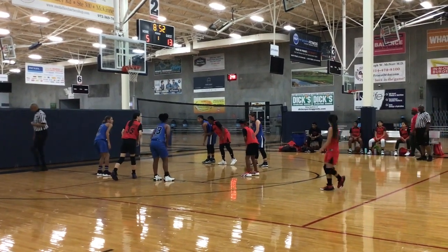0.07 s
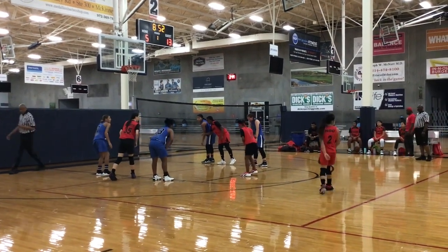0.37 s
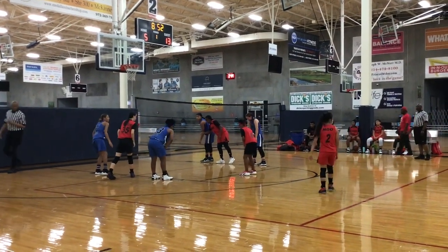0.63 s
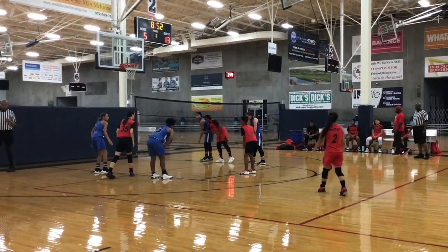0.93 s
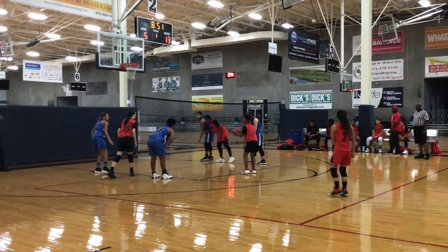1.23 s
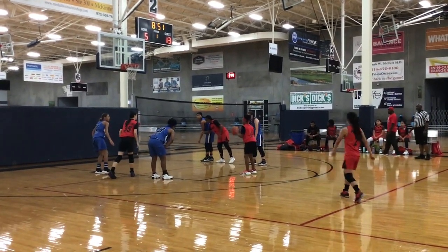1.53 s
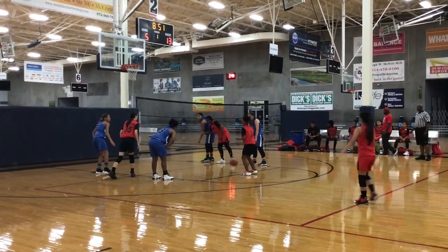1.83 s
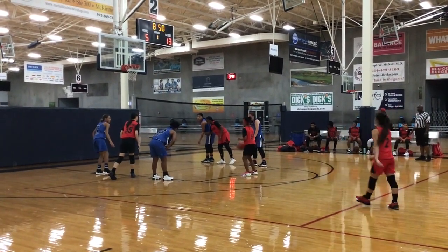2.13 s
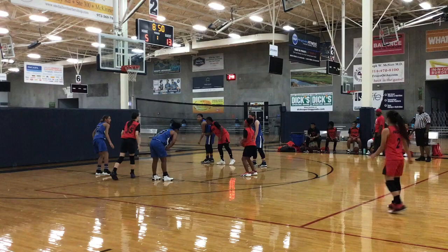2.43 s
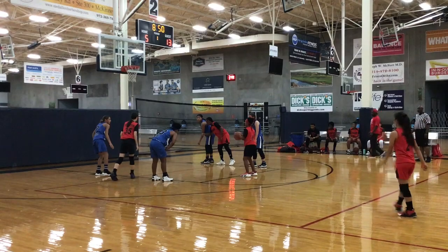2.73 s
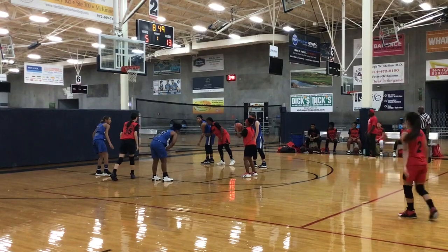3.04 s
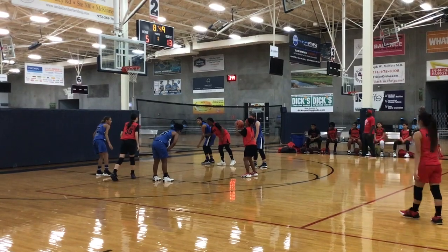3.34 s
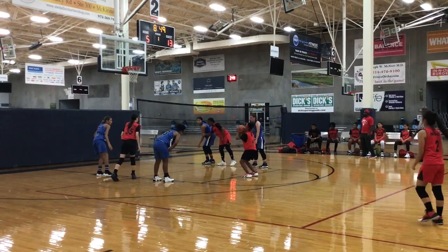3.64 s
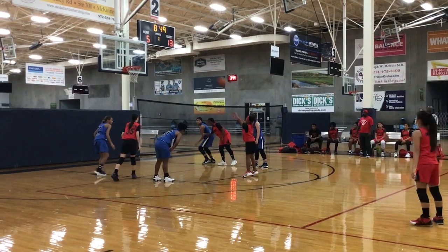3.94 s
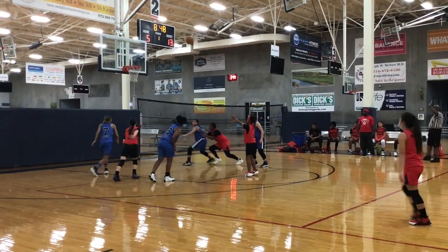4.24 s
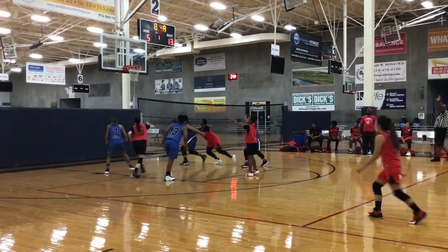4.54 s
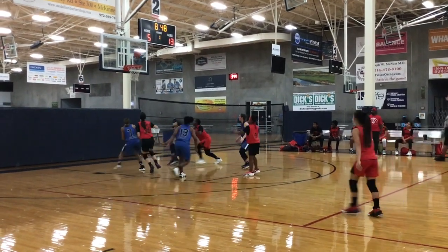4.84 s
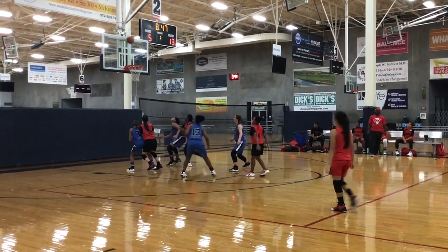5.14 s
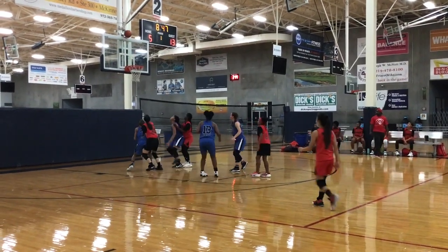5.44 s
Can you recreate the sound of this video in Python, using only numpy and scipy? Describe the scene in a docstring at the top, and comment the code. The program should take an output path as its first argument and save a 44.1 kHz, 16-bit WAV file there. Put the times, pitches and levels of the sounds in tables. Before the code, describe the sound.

A low, steady ventilation rumble and a faint patter of distant feet fill a large gym, where every sound leaves an echoing tail. A brief sneaker squeak opens the scene. A basketball hits the hardwood with a sharp slap and a deep thump at about 0.2 and 0.75 seconds, with heavy footsteps around it until 1 second. A step and a duller bounce come at 2 seconds, followed by a light tap and a small squeak at 2.6. The loudest squeak, short and very high, cuts through at about 3.1 seconds, trailed by a couple of faint taps. The ball bounces a last time at 4.1 seconds. Play then gets busier: a squeak at 4.4, a slapping step at 4.7, and a quick cluster of thudding steps, squeaks and scuffs around 5 seconds, with one more step near 5.5.

```python
"""A large gym with a springy hardwood floor, during a basketball game.
The ball and the players' feet slap the boards and set them thumping. Rubber soles
squeak as they stick and slip, or scuff as they skid. The hall answers with echoes
and a long fading tail, over the rumble of ventilation and the patter of far-off play."""
import sys
import numpy as np
from scipy import signal
from scipy.fft import rfft, irfft, next_fast_len
from scipy.io import wavfile
from scipy.ndimage import uniform_filter1d

SR = 44100
rng = np.random.default_rng(int(sys.argv[2]) if len(sys.argv) > 2 else 0)


def dump_mix(stems):
    """Bounce the given channels to the path in sys.argv[1] as a 16-bit WAV at rate SR."""
    frames = np.atleast_2d(stems).T  # one column per channel
    limited = np.clip(frames, -1, 1)  # hard clip at full scale
    pcm = np.round(limited * 32767).astype(np.int16)
    wavfile.write(sys.argv[1], SR, pcm)


N = 246533  # samples, about 5.6 s


def amp(db):
    """Turns decibels into a number to multiply a sound by."""
    return 10 ** (np.asarray(db) / 20)


def unit(x):
    """Scales a signal so that its average strength (rms) is 1."""
    return x / np.sqrt(np.mean(x ** 2) + 1e-20)


def look_up(points, hz):
    """Reads between the rows of a (frequency [Hz], value) table, with octaves evenly spaced."""
    f, value = np.transpose(points)
    return np.interp(np.log(hz + 1), np.log(f), value)


def add(mix, start_s, sound):
    """Adds a sound to the mix at the given time."""
    part = mix[max(round(start_s * SR), 0):][:len(sound)]
    part += sound[:len(part)]


def colour(x, gain):
    """Turns each frequency f up or down by gain(f)."""
    size = next_fast_len(len(x), True)
    return irfft(rfft(x, size) * gain(np.fft.rfftfreq(size, 1 / SR)), size)[:len(x)]


def noise(size):
    """An even hiss (white noise)."""
    return rng.standard_normal(size)


def wander(size, rate_hz):
    """A smooth random wiggle of strength 1 that changes at about this rate."""
    return unit(colour(noise(size), lambda f: np.exp(-(f / rate_hz) ** 2)))


def band(x, hz, octaves, order=2):
    """Keeps a band of frequencies around hz, scaled to strength 1."""
    edges = np.clip([hz / 2 ** (octaves / 2), hz * 2 ** (octaves / 2)], 1, [SR / 4, SR / 2 - 1])
    return unit(signal.sosfilt(signal.butter(order, edges, "band", fs=SR, output="sos"), x))


def two_paths(sound, send_db):
    """Splits a sound in two: straight to the listener, and sent out into the hall."""
    return np.outer(sound, [1, amp(send_db)])


# The tone of the hall's steady air: (frequency [Hz], relative level [dB])
AIR_TONE = [(15, -46.5), (25, -7), (43, -6.5), (64, -6.5), (82, -1.5), (119, -3), (178, -5.5), (227, -14.5),
            (349, -16.5), (410, -27), (445, -28.5), (1140, -37), (1270, -36.5), (4260, -50), (10500, -64.5),
            (13200, -69), (14200, -60.5), (15700, -63.5)]


def ventilation(rumble_db=-43, swell_db=0.85, fan_db=-50.5, fan_hz=56, fan_width_hz=6):
    """Moving air makes a wide, gently swelling rumble; a fan adds an unsteady drone."""
    rumble = unit(colour(noise(N), lambda f: amp(look_up(AIR_TONE, f))))
    drone = unit(colour(noise(N), lambda f: np.exp(-((f - fan_hz) / fan_width_hz) ** 2)))
    swell = amp(swell_db * wander(N, rate_hz=4.4))
    return amp(rumble_db) * rumble * swell + amp(fan_db) * drone


# How long the hall rings: (frequency [Hz], time to fade by 60 dB [s])
TAIL_FADE = [(100, 0.64), (500, 1), (1500, 2), (4000, 2.1), (7000, 1.43), (10000, 1), (15000, 0.17)]
# The tone of that ringing tail: (frequency [Hz], relative level [dB])
TAIL_TONE = [(100, 0.5), (500, -5.5), (1500, -5), (4000, -4.5), (8000, -5.5), (15000, -20)]
# Echoes from the walls and roof: (delay [s], relative level [dB])
ECHOES = [(0.0112, -8), (0.034, -15.5), (0.043, -13.5), (0.081, -12.5), (0.161, -24)]


def hall(x, build_s=0.00043, early_db=3, early_s=0.048, patchy_db=2, patch_s=0.02, patch_hz=900,
         scatter_s=0.00246, wall_hz=8000):
    """Walls and girders scatter echoes; a dense, uneven tail follows, its highest notes dying first."""
    hz, t, hiss = signal.stft(noise(2 * SR), SR, nperseg=256)  # a grid of frequency by time
    fade_s = look_up(TAIL_FADE, hz)[:, None]
    decay = np.exp(-np.log(1000) * t / fade_s)
    decay *= np.sqrt(2 * np.log(1000) / (fade_s * SR))  # long and short fades get equal energy
    onset = (1 - np.exp(-t / build_s)) * amp(early_db * np.exp(-t / early_s))
    # Random louder and softer patches, mostly in the treble.
    patches = uniform_filter1d(noise(hiss.shape), int(patch_s / t[1]) + 1, axis=1)
    patches = unit(uniform_filter1d(patches, int(patch_hz / hz[1]) + 1, axis=0))
    uneven = unit(amp(patchy_db * patches * (hz / (hz + patch_hz))[:, None]))
    tail = hiss * decay * onset * uneven * amp(look_up(TAIL_TONE, hz))[:, None]
    response = signal.istft(tail, SR, nperseg=256)[1]  # the hall's answer to one click
    scatter = np.exp(-np.arange(SR // 50) / (scatter_s * SR))
    wall_dulling = signal.butter(1, wall_hz, fs=SR)
    for delay_s, db in ECHOES:
        echo = signal.lfilter(*wall_dulling, noise(len(scatter)) * scatter)
        add(response, delay_s, amp(db) * echo / np.linalg.norm(scatter))
    return signal.fftconvolve(x, response)[:len(x)]


# How hard the far-off players run: (time [s], level [dB])
BUSTLE = [(0, -49.5), (.6, -52.5), (1.302, -59.5), (3.999, -56), (4.4, -49), (4.9, -53.5), (5.2, -46.5),
          (5.59, -52.5)]
# The tone of their footsteps: (frequency [Hz], relative level [dB])
PATTER_TONE = [(60, -16.5), (150, 6), (350, -3.5), (700, -10), (1500, -15.5), (3000, -23.5), (6000, -32),
               (15000, -51.5)]


def patter(steps_per_s=45, decay_s=0.0056, spread_db=2, lead_s=1):
    """Light steps all over the court, starting lead_s early so that the hall is already ringing."""
    t = np.arange(-lead_s * SR, N) / SR
    landings = rng.random(len(t)) < steps_per_s / SR
    weights = amp(spread_db * np.clip(noise(len(t)), -2, 1))
    envelope = signal.lfilter([1], [1, -np.exp(-1 / (decay_s * SR))], landings * weights)
    steps = colour(envelope * noise(len(t)), lambda f: amp(look_up(PATTER_TONE, f)))
    return unit(steps) * amp(np.interp(t, *np.transpose(BUSTLE)))


# Short hisses. Most are shoe scuffs; the faint, high one at 3.226 s echoes off the far wall
# after the loud squeak.
# (time [s], length [s], level [dB], centre frequency [Hz], width [octaves], send to hall [dB])
HISSES = [ (1.967, 0.0377, -77, 6840, 0.73, 3.5), (2.024, 0.021, -66, 4190, 1.7, 0),
          (2.048, 0.00345, -58, 5500, 1.24, -8), (3.08, 0.0236, -47, 9130, 1.14, -1),
          (3.0825, 0.012, -49.5, 2900, 2.6, 1), (3.226, 0.0317, -72, 11650, 0.46, -10.5),
          (3.43, 0.022, -67.5, 9140, 0.15, 5), (4.08, 0.0154, -66.5, 7500, 0.89, 5),
          (4.146, 0.04, -72, 8310, 1.3, -7.5), (4.351, 0.0026, -48, 6400, 0.7, -8),
          (4.923, 0.01477, -56, 4400, 1.68, -1), (5.088, 0.016, -43, 4225, 1.03, -12),
          (5.089, 0.041, -42.5, 880, 3.65, 0.5), (5.107, 0.0095, -37, 4050, 0.99, -15.5),
          (5.149, 0.0135, -55.5, 2790, 1.8, -5), (5.324, 0.046, -66, 5250, 1.3, -2),
          (5.389, 0.013, -53, 2490, 0.72, 0)]


def hisses(grain_db=5.0, rise_s=0.00078):
    """Short bursts of grainy hiss: skidding soles, and one echo off the far wall."""
    out = np.zeros((N, 2))
    t = np.arange(SR // 5) / SR
    for start_s, length_s, db, hz, octaves, send_db in HISSES:
        grains = noise(len(t)) * amp(grain_db * wander(len(t), rate_hz=360))
        envelope = (1 - np.exp(-t / rise_s)) * np.exp(-(t / length_s) ** 2)
        add(out, start_s, two_paths(amp(db) * band(grains, hz, octaves) * envelope, send_db))
    return out


# How well a sole gives off sound: (frequency [Hz], relative level [dB])
SOLE_TONE = [(2700, -0.5), (4500, 1), (6600, 3), (8500, -4.5), (11000, 0), (15000, -14)]
# Shoe squeaks and, at 3.228 s, a faint, rough echo of the loud squeak:
# (time [s], length [s], level [dB], pitch [Hz], opening bend [share of pitch],
# closing bend [share of pitch], roughness [0-1], drop per overtone [dB], send to hall [dB])
SQUEAKS = [ (0.0108, 0.0215, -38.5, 4390, 0.075, -0.005, 0.2, 7.8, -4.5),
           (1.196, 0.0104, -74, 4350, 0.03, 0.02, 0.2, 8.5, 16),
           (1.225, 0.00673, -53, 4489, 0.1, -0.08, 0.236, 11, -3.5),
           (2.619, 0.039, -46.5, 3315, -0.16, -0.045, 0.16, 7, -7.5),
           (3.0651, 0.0074, -37.5, 6220, -0.1, 0.039, 0.41, 4.7, -10.5),
           (3.072, 0.029, -38, 5400, 0.06, -0.0076, 0.56, 10, -4.5),
           (3.0803, 0.0119, -27.5, 5700, -0.0061, 0.0059, 0.028, 16, -18),
           (3.083, 0.013, -33, 6596, 0.01, -0.02, 0.19, 28, -11),
           (3.089, 0.015, -54, 3170, 0.016, -0.041, 0.4, 20, 3.5),
           (3.228, 0.0356, -57, 5106, 0.03, -0.012, 0.76, 24, 0),
           (4.3627, 0.01, -34.5, 3496, 0.09, 0.046, 0.18, 8, -7.5),
           (4.9248, 0.011, -46.5, 3155, -0.029, 0.11, 0.4, 9.2, 3),
           (4.939, 0.01116, -39.5, 3585, -0.041, 0.037, 0.58, 10, -5),
           (5.0243, 0.01, -43, 4790, 0.042, -0.01, 0.08, 19.5, 2.5),
           (5.088, 0.019, -42, 2730, 0.031, -0.0058, 0.27, 14.3, -3),
           (5.092, 0.0058, -41, 4700, 0.036, 0, 0.26, 16.7, -7)]


def squeaks(attack_s=0.00093, release_s=0.0033, settle_share=0.3426, lift_share=0.674,
            wobble=0.012, wobble_db=-1.5, wobble_hz=140, jitter=0.0995, jitter_hz=900,
            flutter_depth=0.19, flutter_hz=741, shimmer=0.26, rasp_db=-15):
    """Rubber sticks and slips thousands of times a second; a fluttering tread adds side tones and rasp."""
    out = np.zeros((N, 2))
    t = np.arange(SR // 10) / SR
    harmonic = np.arange(1, 6)[:, None]  # the note and its four overtones
    flutter = flutter_depth * np.sin(2 * np.pi * flutter_hz * t)
    for start_s, length_s, db, pitch_hz, bend, end_bend, rough, drop_db, send_db in SQUEAKS:
        pressure = wander(len(t), wobble_hz)  # uneven pressure sways both pitch and level
        # The pitch settles as the sole takes the weight, then bends again as it lets go.
        settle = 1 + bend * np.exp(-(t / (settle_share * length_s)) ** 4)
        lift = 1 + end_bend * (1 - np.exp(-(t / (lift_share * length_s)) ** 8))
        waver = 1 + wobble * pressure + jitter * rough * wander(len(t), jitter_hz)
        hz = pitch_hz * settle * lift * waver
        phase = 2 * np.pi * np.cumsum(hz) / SR
        strengths = amp(look_up(SOLE_TONE, harmonic * hz) - drop_db * harmonic)
        strengths *= harmonic * hz < SR / 2  # skip overtones too high for the sample rate
        slip = np.sum(strengths * np.sin(harmonic * phase), axis=0)
        grip = 1 + rough * (flutter + shimmer * wander(len(t), jitter_hz))
        rasp = rough * amp(rasp_db) * band(noise(len(t)), pitch_hz, octaves=0.5)
        envelope = np.clip(np.minimum(t / attack_s, (length_s - t) / release_s), 0, 1)
        squeak = amp(db + wobble_db * pressure) * envelope * (unit(slip * grip) + rasp)
        add(out, start_s, two_paths(squeak, send_db))
    return out


def slap(hz, decay_s, octaves, grit=1.0, glide=0.53, glide_s=0.0016, tick_db=-27,
         rattle_db=-19, rattle_s=0.0164, rise_s=0.0013):
    """Air squeezed from under a widening contact chirps downward; the boards rattle after it."""
    t = np.arange(SR // 10) / SR
    pitch = hz * (1 + glide * (2 * np.exp(-t / glide_s) - 1))
    chirp = np.sin(2 * np.pi * np.cumsum(pitch) / SR)
    grain = band(noise(len(t)), hz, octaves)
    tick = amp(tick_db) * noise(len(t)) * np.exp(-t / decay_s)
    burst = (chirp + grit * grain) * np.exp(-(t / decay_s) ** 2 / 2)
    rattle = amp(rattle_db) * grain * np.exp(-t / rattle_s)
    return (burst + tick + rattle) * (1 - np.exp(-t / rise_s))


# Sharp taps of a hand or a shoe tip: (time [s], level [dB], pitch [Hz])
TAPS = [(.34, -41, 2600), (2.123, -41, 2880), (3.298, -45.5, 3980), (3.331, -43.5, 1420),
        (4.128, -44, 2630), (4.33, -46.5, 2400), (4.674, -39.5, 4296)]


def taps(send_db=-5.0):
    """A touch too light to make the floor thump gives only a slap."""
    out = np.zeros(N)
    for start_s, db, hz in TAPS:
        add(out, start_s, amp(db) * slap(hz, decay_s=0.0014, octaves=0.97, grit=0.99, tick_db=-22))
    return two_paths(out, send_db)


def thump(hz, swell_s=0.0081, sharpness=3.78, ring_db=-15.0, ring_hz=225, ring_s=0.024,
          knock_db=-29, knock_hz=480, knock_s=0.0068):
    """The springy boards knock, sink, swing a few times and settle while their higher notes ring on."""
    t = np.arange(SR // 5) / SR
    envelope = (t / swell_s * np.exp(1 - t / swell_s)) ** sharpness
    swing = envelope * np.cos(2 * np.pi * hz * t)
    ring_envelope = np.exp(-t / ring_s) * (1 - np.exp(-t / swell_s))
    ring = band(noise(len(t)), ring_hz, octaves=0.742) * ring_envelope
    knock = band(noise(len(t)), knock_hz, octaves=1.0) * t / knock_s * np.exp(1 - t / knock_s)
    return swing + amp(ring_db) * ring + amp(knock_db) * knock


# Heavy footsteps: (time [s], thump level [dB], thump pitch [Hz], slap level [dB], slap pitch [Hz])
FOOTSTEPS = [(.264, -24.5, 176.8, -45, 2047), (.293, -31, 100.8, -48.5, 1720),
             (0.326, -25, 106.3, -67, 597), (0.5104, -30, 133.4, -54, 1490),
             (0.963, -30.5, 131.9, -53, 1490), (1.966, -28.5, 132, -43, 766),
             (3.594, -34, 151.6, -47, 2326), (4.311, -31.5, 107.4, -48, 1499), (4.681, -40, 133, -34, 755),
             (4.929, -32.5, 107.2, -43.5, 1184), (5.019, -32.5, 122.7, -47, 1220),
             (5.072, -45, 105.8, -38.5, 1270), (5.084, -28.5, 113, -47, 900), (5.1275, -36, 142, -31, 937),
             (5.145, -35, 141, -43, 520), (5.4607, -32, 130, -43, 850)]


def footsteps(toe_delay_s=0.018, toe_slap_db=-7.5, toe_thump_db=-8.5, send_db=-3.5):
    """The heel lands, then the toe, more softly: each slaps the floor and makes it thump."""
    out = np.zeros(N)
    for start_s, thump_db, thump_hz, slap_db, slap_hz in FOOTSTEPS:
        heel = (start_s, slap_db, thump_db)
        toe = (start_s + toe_delay_s, slap_db + toe_slap_db, thump_db + toe_thump_db)
        for at_s, sole_db, floor_db in (heel, toe):
            add(out, at_s, amp(sole_db) * slap(slap_hz, decay_s=0.0021, octaves=1.697, grit=0.84))
            add(out, at_s, amp(floor_db) * thump(thump_hz))
    return two_paths(out, send_db)


def crack(hz=6200, octaves=0.77, decay_s=0.0011):
    """The ball's pebbled skin meets the varnish with a bright click."""
    t = np.arange(SR // 50) / SR
    return band(noise(len(t)), hz, octaves, order=1) * np.exp(-t / decay_s)


# The floor swinging back after each bounce: (delay [s], relative level [dB], pitch [Hz])
FLOOR_REBOUNDS = [(.034, -4.5, 105), (.087, -5.5, 99)]
# The dribbled ball: (time [s], thump level [dB], thump pitch [Hz], slap level [dB],
# slap pitch [Hz], crack level [dB], change to the rebounds' level [dB])
BALL_BOUNCES = [(0.221, -21.5, 121.5, -25.5, 1270, -50.5, -28), (0.7499, -23.5, 121, -24, 1283, -54, -9),
                (2.0373, -24.5, 124.5, -33.5, 1600, -42.5, -1.5),
                (4.075, -20.5, 123.9, -39, 1900, -50.5, 0)]


def ball_bounces(send_db=-1.5):
    """The ball clicks and slaps on the boards; the floor thumps and swings back."""
    out = np.zeros(N)
    for start_s, thump_db, thump_hz, slap_db, slap_hz, crack_db, rebound_db in BALL_BOUNCES:
        add(out, start_s, amp(crack_db) * crack())
        ball_slap = slap(slap_hz, decay_s=0.001, octaves=1.17, rattle_db=-25.0, rattle_s=0.015)
        add(out, start_s, amp(slap_db) * ball_slap)
        add(out, start_s, amp(thump_db) * thump(thump_hz, knock_db=-27.0, knock_hz=500))
        for delay_s, db, hz in FLOOR_REBOUNDS:
            add(out, start_s + delay_s, amp(thump_db + rebound_db + db) * thump(hz))
    return two_paths(out, send_db)


def scene(far_direct_db=-13):
    """Near play is heard directly and through the hall; far steps mostly through the hall."""
    direct, sent = (ball_bounces() + footsteps() + taps() + squeaks() + hisses()).T
    far = patter()
    into_hall = np.pad(sent, (len(far) - N, 0)) + far  # the far steps start earlier
    echoing = hall(into_hall)[-N:]
    return (direct + amp(far_direct_db) * far[-N:] + echoing + ventilation())[None]


def record(dry, low_cut_hz=45, high_cut_hz=15900):
    """The microphone drops the deepest bass; then the very highest treble is cut off."""
    thinned = colour(dry[0], lambda f: 1 - np.exp(-(f / low_cut_hz) ** 5))
    treble_cut = signal.firwin(511, high_cut_hz, window=("kaiser", 9), fs=SR)
    return signal.oaconvolve(thinned, treble_cut, "same")[None]


dry = scene()
out = record(dry)
dump_mix(out)
```